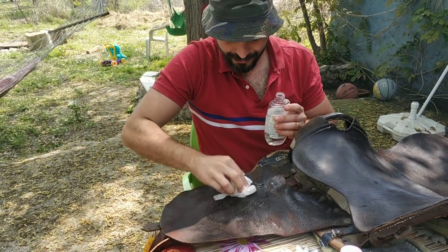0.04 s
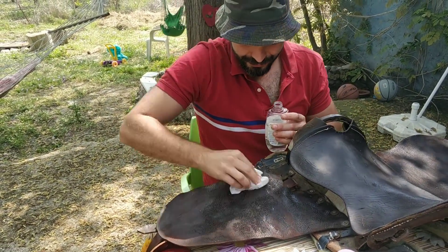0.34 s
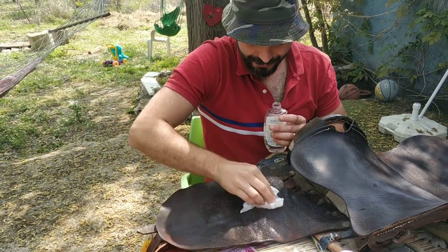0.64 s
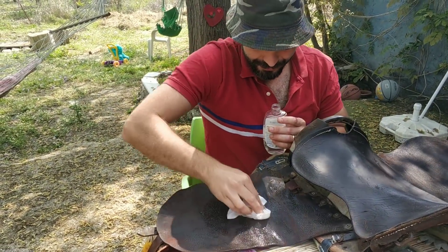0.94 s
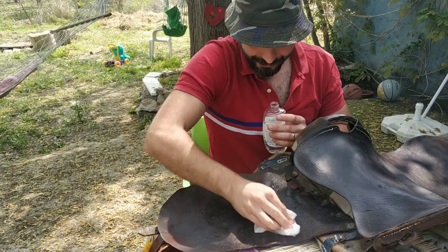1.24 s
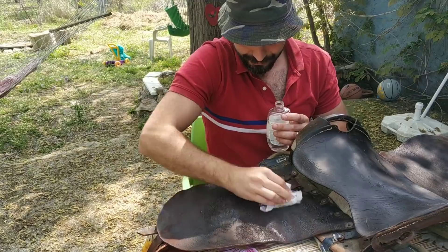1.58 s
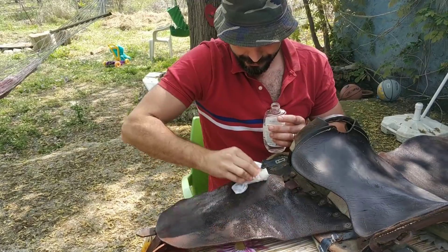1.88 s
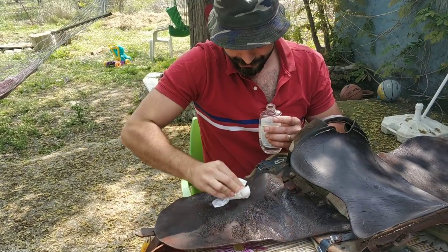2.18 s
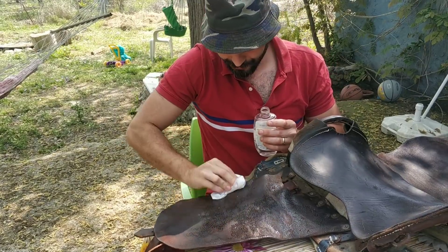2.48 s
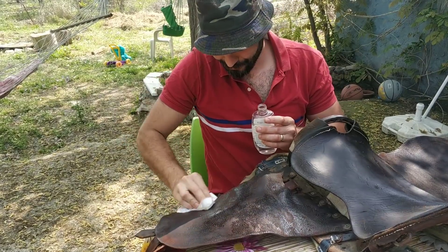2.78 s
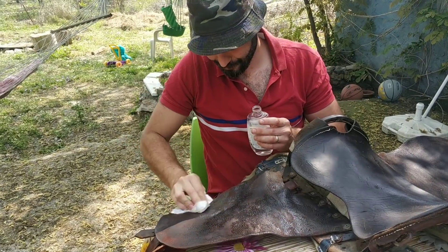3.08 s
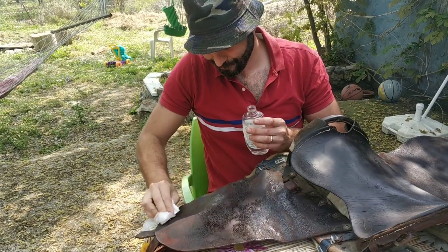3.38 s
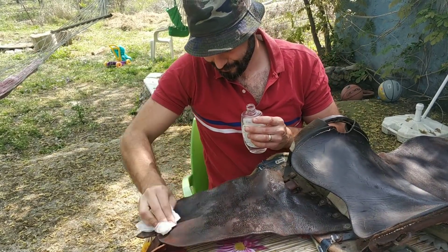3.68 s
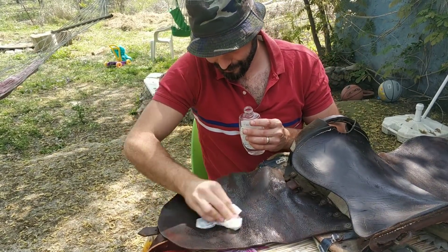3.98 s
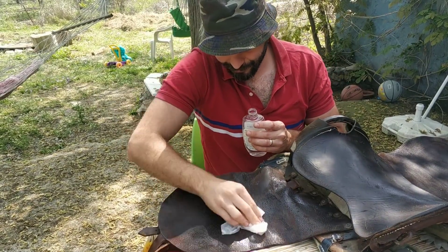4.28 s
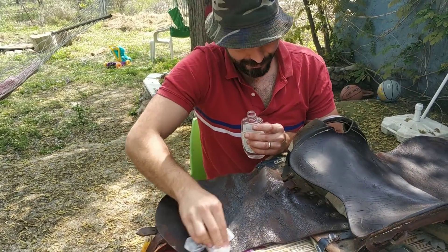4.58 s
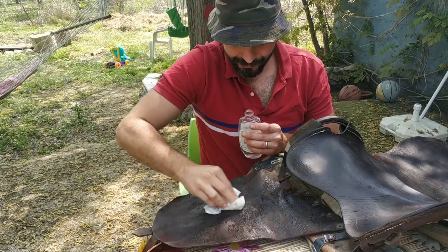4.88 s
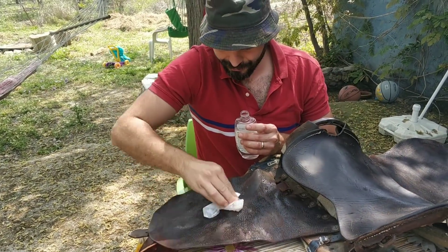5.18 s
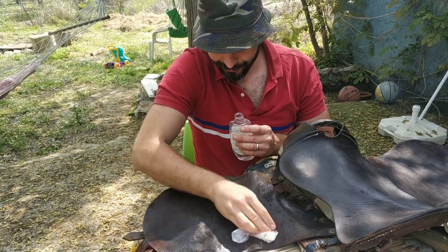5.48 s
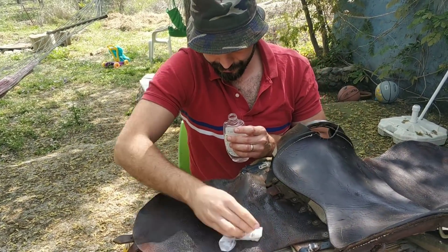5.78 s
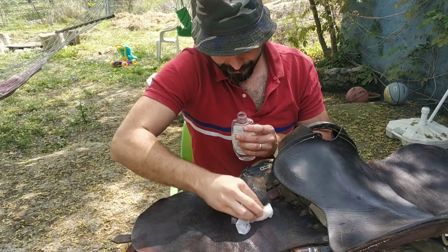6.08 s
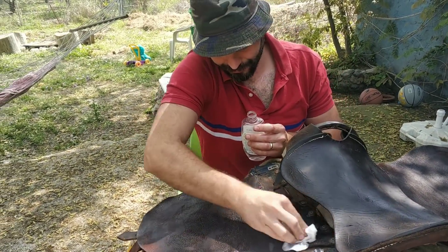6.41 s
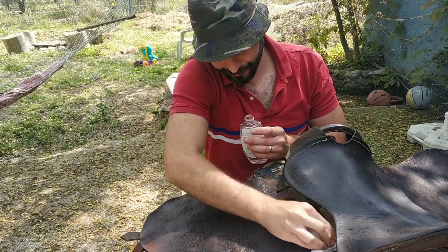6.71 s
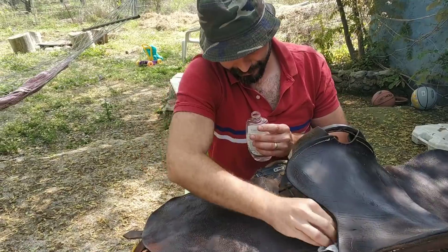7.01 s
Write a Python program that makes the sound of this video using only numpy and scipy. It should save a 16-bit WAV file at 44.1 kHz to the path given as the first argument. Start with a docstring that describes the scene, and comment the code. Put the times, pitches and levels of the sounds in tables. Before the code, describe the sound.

Outdoors in a garden, wind buffets the microphone with an uneven low rumble and soft thumps while someone wipes a leather saddle with a cloth. The strokes are rapid, hissy and slightly scratchy, near and a little to the left, varying in pressure without stopping. Now and then the pad taps the leather. A few faint high bird whistles and low hoots come from far away, and the wind drops near the end.

```python
"""Garden: a cloth pad wipes oil into a leather saddle with quick to-and-fro strokes.
Each stroke hisses as fibres slip over the grain and rasps through the flap; most hush as the hand turns.
Now and then the pad knocks the flap. Breeze eddies rumble and thump at two microphone ports.
Far off, birds whistle and hoot over a steady hush."""
import sys
import numpy as np
from scipy import signal
from scipy.fft import rfft, irfft
from scipy.io import wavfile
from scipy.ndimage import uniform_filter1d

SR = 44100
rng = np.random.default_rng(int(sys.argv[2]) if len(sys.argv) > 2 else 0)


def transcribe(u):
    """Save the signal u as a 16-bit wav file named by the first command-line argument.

    u: samples, shape (n,) or (channels, n), limited to [-1, 1]; the rate is SR.
    q: integer samples, one column per channel.
    """
    v = np.clip(np.atleast_2d(u).T, -1, 1)
    q = np.round(v * 32767).astype(np.int16)
    wavfile.write(sys.argv[1], SR, q)


N = 319725
TIME_S = np.arange(N) / SR

# breeze at each port: t/s, level/dB
BREEZE_LEFT = [(0, -31), (.27, -31), (.37, -25.5), (.9, -28.5), (1.15, -26.5), (1.6, -28), (2.4, -26),
               (2.93, -25.5), (3.15, -37), (3.5, -25), (3.85, -20.5), (4.3, -27), (4.7, -28.5), (5.1, -27),
               (5.76, -26.5), (5.87, -36.5), (6.3, -35.5), (6.8, -59), (7.25, -45)]
BREEZE_RIGHT = [(0, -38), (1.15, -37.5), (1.35, -28.5), (1.55, -38.5), (2.2, -31.5), (2.85, -26.5),
                (3.18, -40), (3.38, -26), (3.9, -36), (4.1, -31.5), (5.05, -36), (5.75, -30.5), (5.9, -40),
                (6.05, -28), (6.45, -41), (6.85, -41), (7.08, -33), (7.25, -32)]


def amp(db):
    """Decibels to gain."""
    return 10 ** (np.asarray(db) / 20)


def unit(x):
    """Each channel to rms 1."""
    return x / np.sqrt(np.mean(x ** 2, axis=-1, keepdims=True) + 1e-20)


def along(curve):
    """A (t/s, value) curve at every sample."""
    return np.interp(TIME_S, *np.transpose(curve))


def colour(x, spectrum):
    """Filter by (f/Hz, level/dB) points on a log-frequency axis; rms 1."""
    hz, db = np.transpose(spectrum)
    bins_hz = np.fft.rfftfreq(N, 1 / SR)
    gain = amp(np.interp(np.log(bins_hz + 1), np.log(hz), db))
    return unit(irfft(rfft(x) * gain, N))


def wander(hz, size=N):
    """Random drift up to about hz; rms 1."""
    bins_hz = np.fft.rfftfreq(size, 1 / SR)
    return unit(irfft(rfft(rng.standard_normal(size)) / (1 + (bins_hz / hz) ** 4), size))


def add(mix, start_s, sound):
    """Mix a sound into one channel."""
    part = mix[max(round(start_s * SR), 0):][:len(sound)]
    part += sound[:len(part)]


def slips(per_s, spread_db, smooth):
    """Tiny slips of uneven size over the even noise of countless smaller ones."""
    size = amp(spread_db * np.minimum(rng.exponential(1, N), 4))
    clicks = size * rng.standard_normal(N) * (rng.random(N) < per_s / SR)
    return unit(unit(clicks) + smooth * rng.standard_normal(N))


def cloth_folds(x, patch_db, bright_db):
    """Colour tilts with the grip and shifts in patches as different folds touch the leather."""
    hz, t, spectra = signal.stft(x, nperseg=512)
    patches = uniform_filter1d(rng.standard_normal(spectra.shape), size=9, axis=0)
    patches = uniform_filter1d(patches, size=9, axis=1)
    tilt = np.interp(hz, [3800, 8000, 12000], [-.9, -.1, .6])
    tilt_db = np.outer(tilt, np.interp(t, TIME_S, bright_db))
    gain = amp(patch_db * patches / patches.std() + tilt_db)
    return unit(signal.istft(spectra * gain, nperseg=512)[1][:N])


def fibre_hiss(speed, firm_db):
    """Fibres slip over the grain; brighter when firmer, faster or further left."""
    # hiss spectrum at each port: f/Hz, level/dB
    left = [(1200, -94), (2700, -17.5), (3300, -9.5), (3800, -5), (4300, -10.5), (5000, -13), (6600, -9.5),
            (7100, -9), (8200, -3), (9200, 0), (11500, 2), (13100, 0.5), (14200, -0.5)]
    right = [(1200, -74), (2700, -46), (3300, -9), (5000, -2), (6700, 0), (8000, 3), (9000, 0),
             (10000, -3.5), (11000, 0), (12500, -18), (14200, -3.5)]
    # pad position on the flap: t/s, left minus right/dB
    place = [(0, 7), (1, 7), (2.25, 7), (2.5, 4.5), (3.7, 5), (4.4, 6.5), (5.4, 6), (6.3, 6.5), (7.2, 8.5)]
    pan_db = along(place) + 0.2 * firm_db  # firm strokes lean left
    ports = np.array([amp(pan_db), np.ones(N)]) * np.sqrt(2 / (1 + amp(pan_db) ** 2))
    bright_db = 6 * firm_db + 5 * (pan_db - 6) + 1.5 * (speed - 1)
    hiss = []
    for spectrum in (left, right):
        fibres = colour(slips(per_s=5000, spread_db=1.7, smooth=1.67), spectrum)
        hiss.append(cloth_folds(fibres, patch_db=2.25, bright_db=bright_db))
    return ports * np.array(hiss)


def flap_rasp():
    """The flap radiates the slips, more where loose; arm, chest and ground scatter them back."""
    # flap spectrum: f/Hz, level/dB
    body = [(250, -1.5), (500, -0.5), (750, 0.5), (1100, -2.5), (1420, 2.5), (1800, 0), (2250, -0.5),
            (2500, 1.5), (2800, 1), (3500, 0.5), (4500, -14.5), (8000, -13)]
    # looseness under the pad: t/s, extra rasp/dB
    looseness = [(0, 0), (1.2, -1), (2.3, 1), (3.6, -1.5), (4.7, 0.6), (5.6, 0.5), (6.1, -2), (7.2, -2.5)]
    leather = colour(slips(per_s=2600, spread_db=2.7, smooth=1.6), body)
    direct = cloth_folds(leather, patch_db=2.78, bright_db=np.zeros(N))
    scattered = amp(-7) * colour(rng.standard_normal((2, N)), body)
    return amp(along(looseness)) * (direct + scattered)


def rubbing():
    """Hand speed and pressure set the friction that drives hiss and rasp."""
    # strokes, each lasting until the next: t/s, pressure as level/dB, start-to-end rise/dB
    strokes = [(-0.05, -46, -7), (0.06, -44, -4), (0.19, -41.5, 5.0), (0.344, -43.5, 7), (0.54, -41.5, -5),
               (0.712, -40.5, 9), (0.888, -41.5, -8), (1.061, -41.5, 5), (1.228, -38.5, -4.5),
               (1.43, -40.0, 1.0), (1.522, -40, -2), (1.71, -41.5, 2), (1.837, -42, 4.0), (1.927, -42.5, 0),
               (2.028, -45, -3), (2.117, -42.0, 4), (2.219, -44.5, 3), (2.304, -40, 2), (2.412, -43.5, 6.0),
               (2.524, -41.5, -2), (2.625, -45, -2), (2.76, -42, -4), (2.871, -45, -2), (3.002, -43, -2),
               (3.152, -45, 5), (3.274, -44.0, -12.5), (3.437, -43.5, 13), (3.591, -40, -15),
               (3.73, -42.5, 0), (3.85, -42, -10), (3.976, -43.5, 2), (4.099, -40, 1.0), (4.223, -41.5, 5),
               (4.356, -41.5, -4), (4.463, -41.5, 3.0), (4.572, -41.5, -5), (4.716, -41, -3.5),
               (4.872, -42, -8), (5.048, -43.5, 0), (5.189, -44, -4), (5.378, -42.5, 6), (5.604, -41.0, -8),
               (5.74, -43, 4), (5.872, -45, 11), (5.979, -42.5, -4), (6.121, -43, -6), (6.348, -41.5, -2.5),
               (6.54, -45.0, -12), (6.725, -43, 9), (6.882, -43.5, -8.5), (7.031, -44, 20),
               (7.162, -48.5, -16), (7.3, -37, 0.0)]
    # hand turns, high if looped, low if stopped dead: t/s, relative level/dB
    turns = [(0, 1), (.71, -2.5), (.89, -11), (1.06, -16), (1.43, -11), (1.52, 1), (2.12, -8), (2.9, -14),
             (3.15, -7), (3.44, -18), (3.59, -9), (4.7, -8.5), (5.19, -3.5), (5.6, 0.5), (5.87, -14),
             (6.12, -10), (7.03, -26), (7.16, 1)]
    usual_db, catch_db, catch_hz = -42.5, 1.05, 54
    start_s, stroke_db, rise_db = np.transpose(strokes)
    index = np.arange(len(start_s))
    phase = np.interp(TIME_S, start_s, index)
    stroke = phase.astype(int)
    press_db = stroke_db[stroke] + rise_db[stroke] * (phase - stroke - .5)
    firm_db = np.interp(phase, index + .5, stroke_db) - usual_db
    speed = np.minimum(abs(np.sin(np.pi * phase)) * 1.156, 1) ** 1.36  # zero at stroke ends
    turning = (1 - speed) * amp(usual_db + firm_db + along(turns) - 3.5)
    sliding = speed * amp(press_db + 1.89)
    friction = (turning + sliding) * amp(catch_db * wander(catch_hz))  # pad catches and lets go
    hiss = amp(-1.51) * friction * fibre_hiss(speed, firm_db)
    rasp_drive = (friction / amp(usual_db)) ** 0.72  # grows more slowly than the hiss
    return hiss + amp(usual_db - 13.82) * rasp_drive * flap_rasp()


def breeze():
    """Eddies rumble independently at each port, sharper as it blows harder."""
    # rumble spectra by breeze strength: f/Hz, level/dB
    light = [(5, -3), (20, 2.5), (45, 1), (75, -5), (110, -14), (160, -22.5), (250, -47), (500, -73),
             (1200, -90)]
    strong = [(5, -20), (25, 1.5), (50, 3), (80, 2), (130, -2), (200, -11.5), (300, -22), (450, -35),
              (700, -44.5), (1500, -66)]
    dips_per_s, gust_db, gust_hz = 70, 3.2, 16
    out = []
    for wind in (BREEZE_LEFT, BREEZE_RIGHT):
        wind_db = along(wind)
        strength = np.clip((wind_db + 35) / 15, 0, 1)
        dips = -rng.uniform(.3, 1, N) * (rng.random(N) < dips_per_s / SR)  # brief suction
        gusts = amp(gust_db * np.clip(wander(gust_hz), -2, 1))
        eddies = gusts * (unit(dips - dips.mean()) + 0.76 * rng.standard_normal(N))
        rumble = (1 - strength) * colour(eddies, light) + strength * colour(eddies, strong)
        out.append(amp(wind_db - 0.1) * rumble)
    return np.array(out)


def garden_air():
    """Steady hush, partly common to both ports."""
    # hush spectrum: f/Hz, level/dB
    hush = [(30, -9), (200, 18), (350, 10.5), (600, 7.5), (1000, 4.5), (2000, -4), (4000, -2.5), (8000, 3),
            (14000, -9)]
    return amp(-62) * colour(rng.standard_normal((2, N)) + 0.74 * rng.standard_normal(N), hush)


def flap_knocks():
    """The pad bumps the flap, which rings briefly against the saddle."""
    # bumps: t/s, relative peak/dB
    bumps = [(0.511, -40), (1.799, -37), (2.008, -34.5), (3.85, -41.5), (4.89, -38), (5.229, -41.5),
             (5.401, -40.5), (5.671, -38), (6.391, -39)]
    # saddle modes: f/Hz, level/dB, t60/s
    modes = [(726, 4.5, 0.044), (856, 6, 0.051), (1054, 5, 0.032), (1330, 9.5, 0.01), (1760, 5.5, 0.0089),
             (2980, 2, 0.013)]
    attack_s = 0.00021  # cloth softens the blow
    out, t = np.zeros(N), TIME_S[:SR // 10]
    for start_s, db in bumps:
        detunes = 1 + 0.044 * rng.standard_normal(len(modes))
        ring = np.zeros(len(t))
        for (hz, mode_db, t60_s), detune in zip(modes, detunes):
            decay = amp(mode_db - 60 * t / t60_s)
            ring += decay * np.sin(2 * np.pi * (hz * detune * t + rng.random()))
        ring *= 1 - np.exp(-t / attack_s)
        add(out, start_s, amp(db - 2.5) * ring / abs(ring).max())
    return out


def add_eddy(port, centre_s, db, hz):
    """One eddy pushes on the port, then sucks sharply: a low thump, its spectrum centred on hz."""
    t = np.arange(-1300, 1301) / SR
    pressure = -(np.exp(-.6j) / (1 - 2j * np.pi * hz * t / 3) ** 3).real
    add(port, centre_s + t[0], amp(db) * pressure * signal.windows.tukey(len(t), .5))


def buffets():
    """Large eddies strike the ports; lesser ones come at random in strong breeze."""
    # large eddies: t/s, level/dB, port (0 left, 1 right)
    strikes = [(.646, -16, 0), (2.221, -16.5, 0), (2.432, -10.5, 0), (2.461, -15, 0), (2.57, -11, 1),
               (2.917, -15, 1), (3.004, -18, 1), (3.58, -12, 0), (3.599, -9.5, 0), (3.733, -13.5, 0),
               (3.78, -8.5, 0), (3.811, -7.5, 0), (3.852, -15.5, 0), (3.874, -15, 0), (4.344, -16, 0),
               (4.543, -15, 0), (4.76, -14.5, 0), (4.829, -16, 0), (5.083, -12.5, 0), (5.511, -16, 0),
               (7.073, -23.5, 1)]
    large_hz, reference_db, db_per_octave = 162.4, -11.5, 15.5  # stronger is quicker
    small_hz, spread_db = 164, 3.5
    out = np.zeros((2, N))
    for centre_s, db, side in strikes:
        hz = large_hz * 2 ** ((db - reference_db) / db_per_octave)
        add_eddy(out[int(side)], centre_s, db, hz)
    for port, wind in zip(out, (BREEZE_LEFT, BREEZE_RIGHT)):
        wind_db = along(wind)
        per_s = 3.5 * np.clip((wind_db + 32) / 7, 0, 2)
        arrivals = np.flatnonzero(rng.random(N) < per_s / SR)
        small_db = wind_db + 3 + spread_db * np.clip(rng.standard_normal(N), -2, 1)
        for i in arrivals:
            add_eddy(port, TIME_S[i], small_db[i], small_hz)
    return out


def far_calls(calls, length_s, waver, t60_s):
    """Wavering, fading tones smeared by echoes from trees and walls."""
    direct, count = np.zeros(N), int(length_s * SR)
    envelope = signal.windows.tukey(count, .5) * amp(np.linspace(0, -6, count))
    for start_s, db, start_hz, end_hz in calls:
        hz = np.linspace(start_hz, end_hz, count) * (1 + waver * wander(hz=157, size=count))
        add(direct, start_s, amp(db) * envelope * np.sin(2 * np.pi * np.cumsum(hz) / SR))
    t = TIME_S[:SR // 2]
    echoes = unit(rng.standard_normal((2, len(t))) * amp(-60 * t / t60_s)) / np.sqrt(len(t))
    return direct + .5 * signal.fftconvolve(direct[None], echoes, axes=1)[:, :N]


def bird_whistles():
    """High glides, far off and slightly right."""
    # whistles: t/s, level/dB, start f/Hz, end f/Hz
    calls = [(.97, -59, 4510, 4600), (1.86, -57, 3880, 3360), (2.93, -58, 4230, 4550),
             (4.4, -57, 3950, 3400), (5.38, -49, 4350, 4630), (6.77, -57, 3880, 3130)]
    return far_calls(calls, length_s=.18, waver=0.0125, t60_s=.22) * amp([[-2], [1]])


def bird_hoots():
    """Faint, low calls on one pitch."""
    # hoots: t/s, level/dB
    hoots = [(2.3, -57), (3.27, -59), (5.115, -55)]
    hz = 680
    calls = [(start_s, db, hz, hz) for start_s, db in hoots]
    return far_calls(calls, length_s=0.09, waver=.025, t60_s=0.35)


def scene():
    """Birds, saddle, wind and air in stereo."""
    birds = bird_whistles() + bird_hoots()
    return birds + rubbing() + flap_knocks() + breeze() + buffets() + garden_air()


def record(dry):
    """Steep low-pass."""
    edge_hz = 14280
    taps = signal.firwin(601, edge_hz, window=("kaiser", 9), fs=SR)
    return signal.oaconvolve(dry, taps[None], "same")


dry = scene()
out = record(dry)
transcribe(out)
```